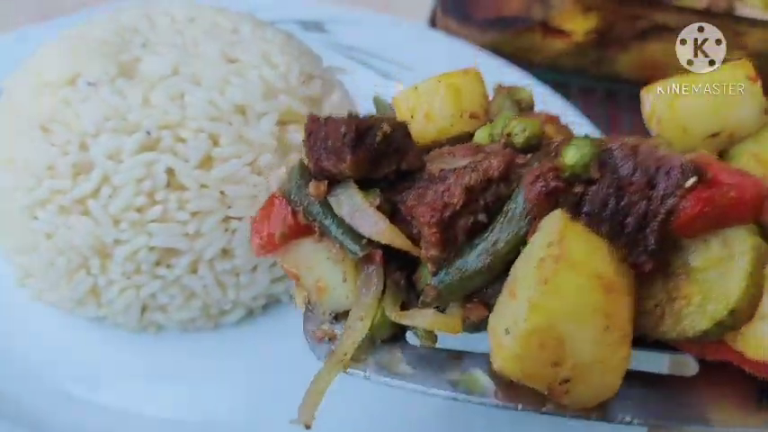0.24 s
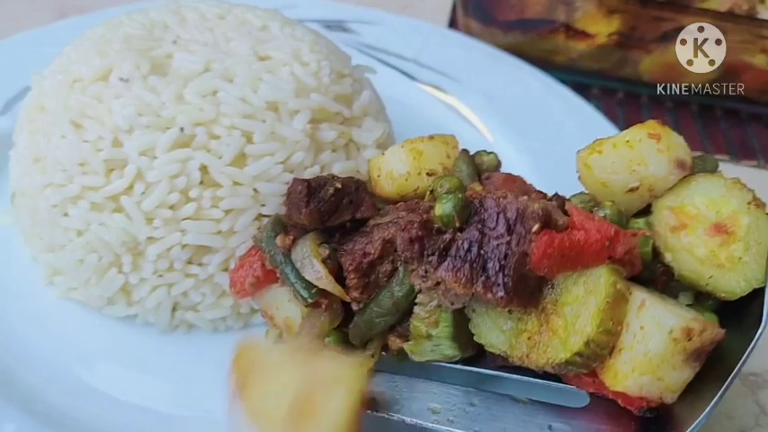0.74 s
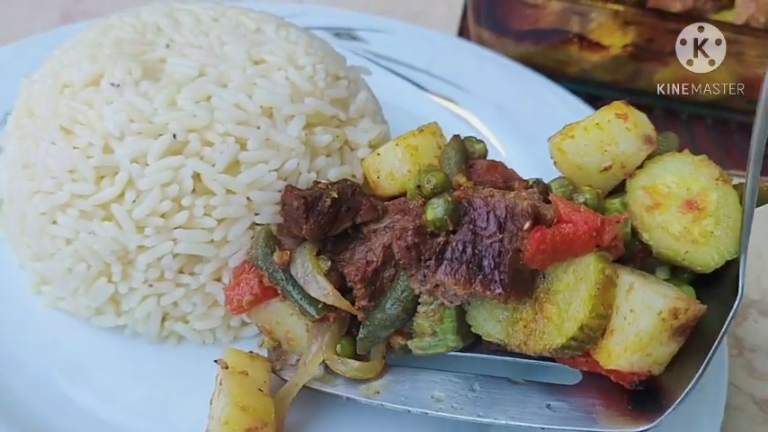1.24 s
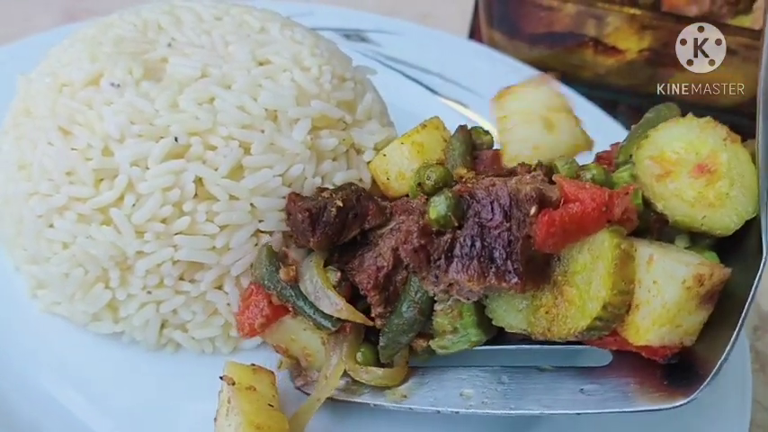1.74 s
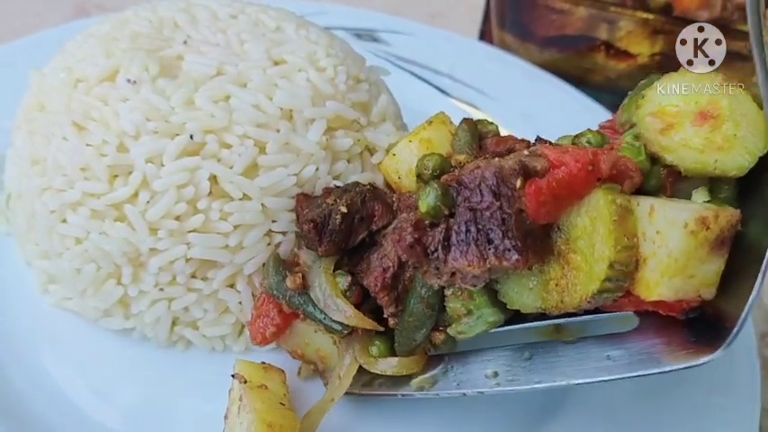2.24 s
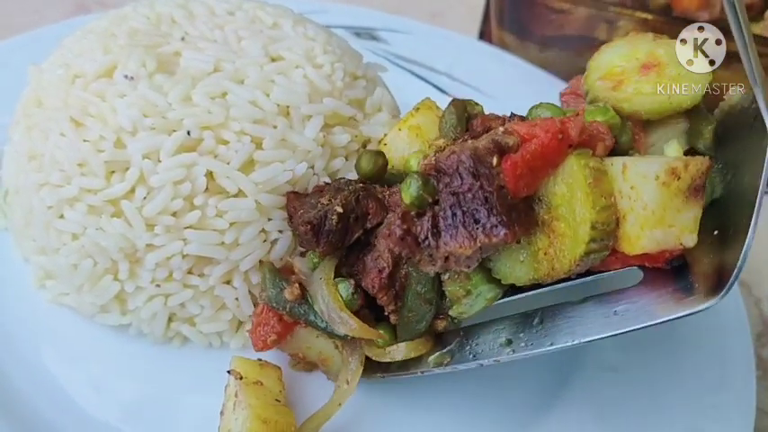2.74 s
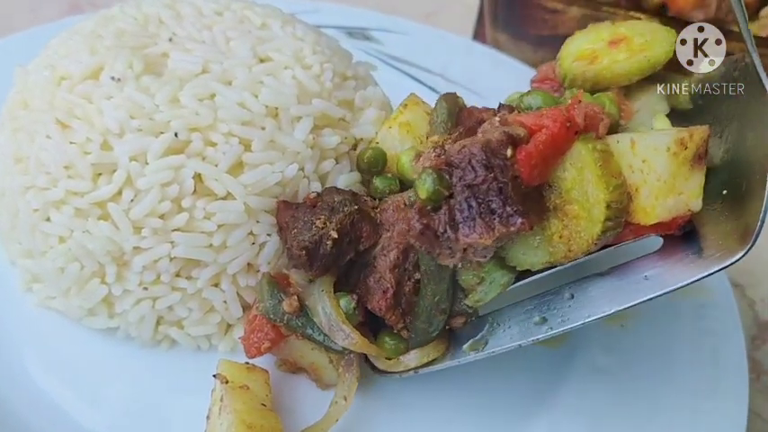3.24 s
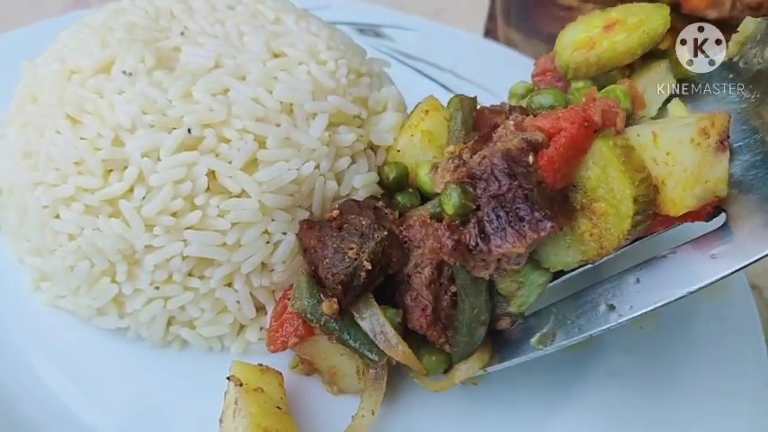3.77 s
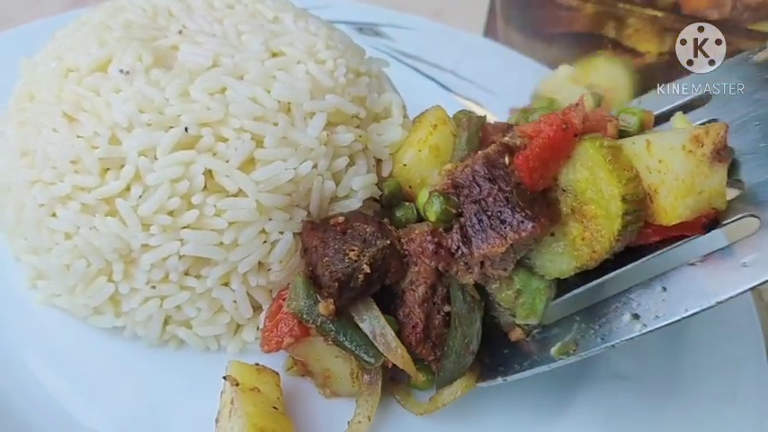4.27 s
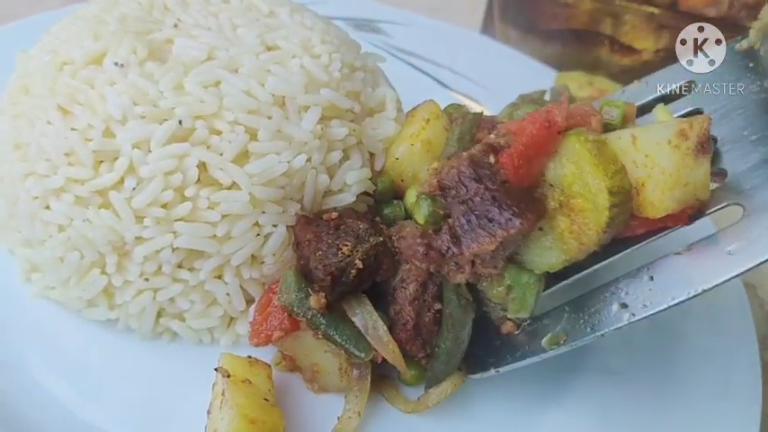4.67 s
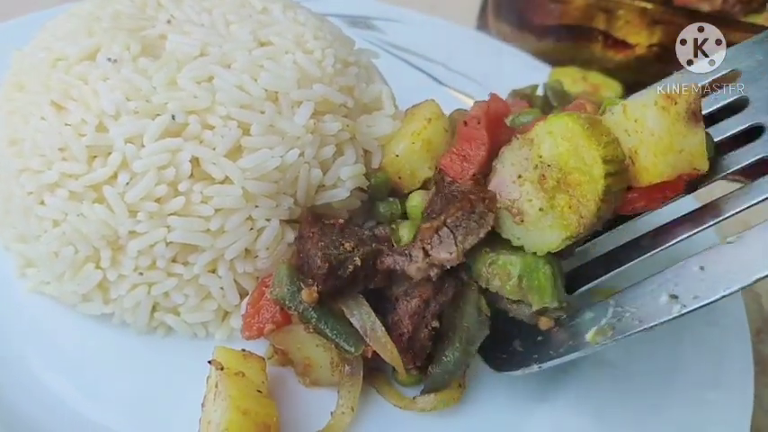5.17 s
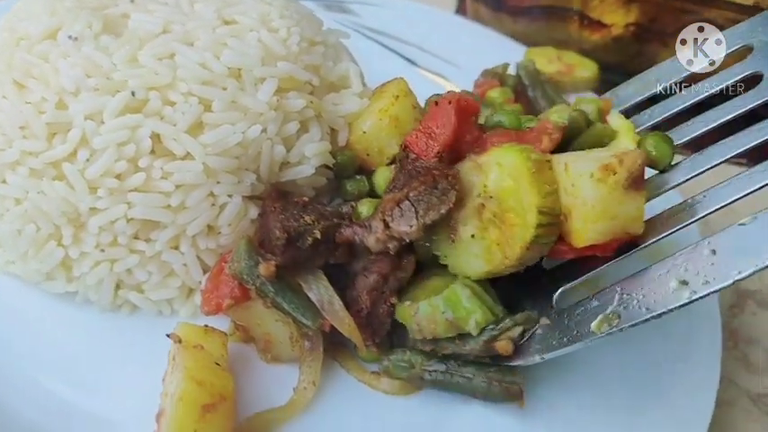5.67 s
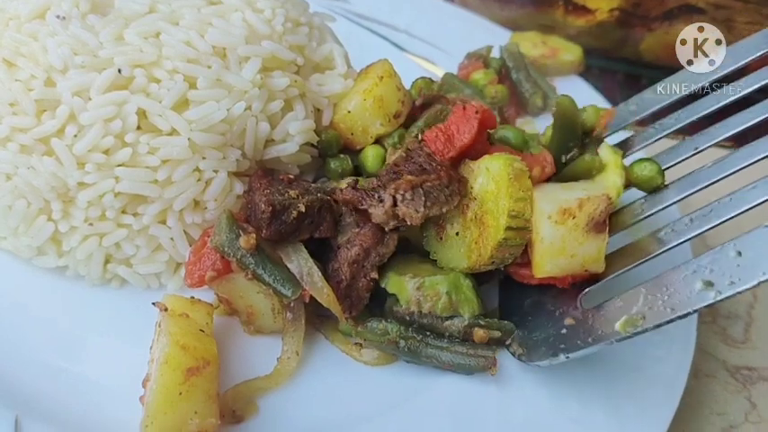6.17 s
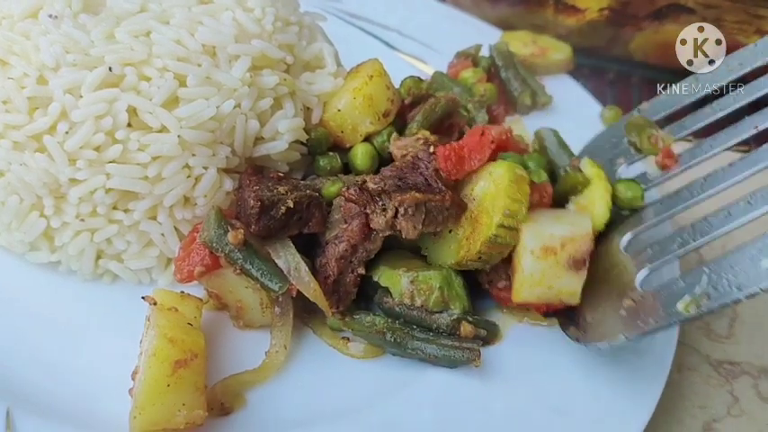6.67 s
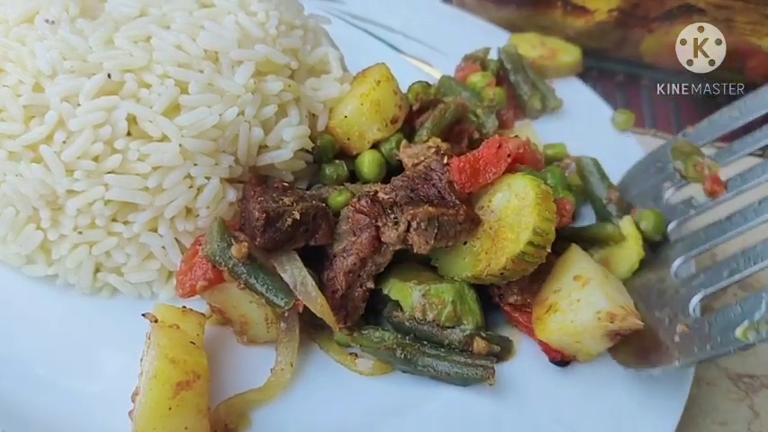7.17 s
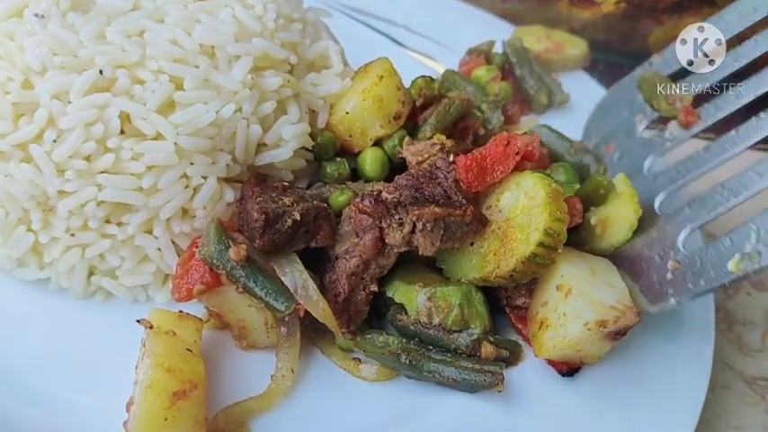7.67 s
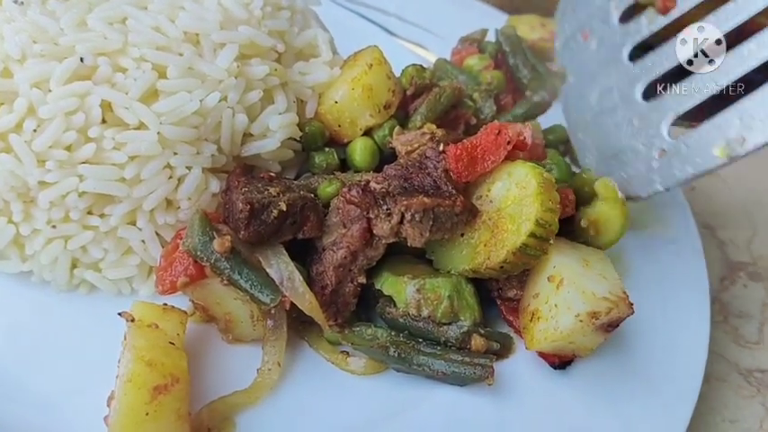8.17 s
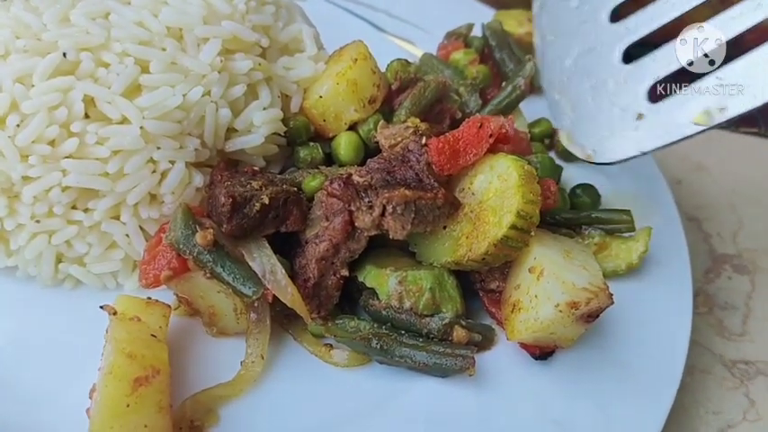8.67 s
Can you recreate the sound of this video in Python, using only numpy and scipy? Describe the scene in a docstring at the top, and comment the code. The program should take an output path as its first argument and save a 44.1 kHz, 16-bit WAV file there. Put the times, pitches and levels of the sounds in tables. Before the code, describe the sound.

A quiet home kitchen, close stereo phone pickup, about 9 seconds. Hot food hisses faintly, thinning away, over soft low outdoor rumble; a far dog barks very faintly, mostly as echo, near 0.7, 2.3, 3.1, 6.7, 7.2 and after 8.1. Tiny handle ticks run from 0.7 to 1.2. A spoon taps a slotted steel spatula: lightly at 1.4 and 2.0, stronger at 2.2, brightest at 2.55 with a quick follow-up, again clearly at 3.6, and weakly at 4.5. At 4.64 the blade clacks on a china plate; faint scraping chatter and rustle follow at 5.35-5.5. A clear clink at 6.3 leads into a tiny drag. At 7.13 one hard, bright knock, by far the loudest, rings briefly and clatters, with small skids just after. Then only thin rustle, sparse wet pops and rumble remain. Metal sounds are short and dry, with little room tail.

```python
"""In a kitchen, hot food (shaped noise) hisses less and less, over a low outdoor rumble (low shaped noise).
Far off a dog seems to bark now and then (hoarse harmonic notes, mostly echo), and a handle ticks faintly.
A spoon taps a slotted steel spatula; then its blade skids and drags on a china plate, just right of a phone,
as the food slides off with a rustle and a few wet pops; late on, the blade knocks the plate once hard.
Every contact is a chatter of tiny ticks that feeds fading modes, with a dry crack and a clatter of noise."""
import sys
import numpy as np
from scipy import signal
from scipy.fft import rfft, irfft, next_fast_len
from scipy.io import wavfile
from scipy.ndimage import uniform_filter1d

SR = 44100
rng = np.random.default_rng(int(sys.argv[2]) if len(sys.argv) > 2 else 0)


def wav_record(signal):
    """Record a signal, one row per channel, as 16-bit PCM in the file named by sys.argv[1]."""
    frames = np.transpose(np.atleast_2d(signal))
    bounded = np.clip(frames, -1, 1)
    # unit amplitude maps onto the largest positive 16-bit level
    quanta = np.round(bounded * 32767).astype(np.int16)
    wavfile.write(sys.argv[1], SR, quanta)


N = 392931
SIZE = next_fast_len(N)
HZ = np.maximum(np.arange(SIZE // 2 + 1) * SR / SIZE, 1)  # frequency of each spectrum bin
SPOT_DB = 7  # how much a blow favours the modes close to one named frequency


def spoon_taps():
    """A spoon taps the steel blade: clean blows start its modes nearly in step."""
    # taps: t/s, peak level/dB, brightness/dB per octave, left minus right/dB, ring share of t60,
    # [(f/Hz, gain/dB) of modes favoured or stilled]
    taps = [(1.4332, -36, 3.5, 2.5, 0.69, [(1860, 7), (2850, 11), (5980, 4)]),
            (1.989, -30.5, 5.5, 4.3, 0.96, [(1690, 14), (2186, 13), (4560, 6), (5980, 3)]),
            (2.2157, -24.5, 1.5, 6, 0.87, [(1800, -2), (1631, -9), (6600, 5), (2186, 5), (3120, 5.5)]),
            (2.55, -20.5, 5, 2, 0.64, [(1850, 9), (7400, 0), (2186, 8), (3120, -1), (4930, 6.5)]),
            (2.645, -29.5, 1.5, 2.5, 0.7, [(1790, -0.5), (3120, 4)]),
            (3.581, -25, 4.5, 2, 0.75, [(1850, 14.5), (2912, 0), (6700, 10), (4180, 2)]),
            (3.9865, -57, -1, -4, 0.88, [(1760, 4)]), (4.225, -60.5, 0, -17, 1, [(1700, 7), (2400, 12)]),
            (4.53, -36, -0.5, 4, 0.9, [(1660, 8), (2400, 6), (3120, -3), (1830, -4)])]
    # modes of blade under the spoon: f/Hz; then relative level/dB, t60/s
    mode_hz = [1760, 1631, 1820, 1875, 2186, 2480, 2912, 3120, 4180, 4560, 4930, 6218, 6700, 8000, 9700,
               11600, 5980, 7400, 8900]
    modes = [(11, 0.032), (-8, 0.12), (6, 0.031), (-4.5, 0.032), (-16, 0.23), (-7, 0.057), (-7, 0.07),
             (-1, 0.024), (-17, 0.035), (-20.5, 0.042), (-12, 0.018), (-7.5, 0.019), (-4.5, 0.019),
             (-12, 0.027), (-26.5, 0.068), (-30, 0.023), (-7, 0.0265), (-12, .025), (-19, 0.014)]
    skid_ms = 2.8
    contacts = [(s, db, tilt, skid_ms, pan, ring, spots) for s, db, tilt, pan, ring, spots in taps]
    return strike(contacts, mode_hz, modes, spot_db=0.28, crack_db=-12.0, clatter_db=-14, clatter_s=0.03,
                  top_hz=9600, jolt=0.29, loose=0.15)


def handle_ticks():
    """Faint ticks of the handle, each favouring one of its modes."""
    # ticks: t/s, peak level/dB, favoured mode f/Hz
    handle_contacts = [(0.668, -50.5, 1390), (0.679, -61, 1390), (0.7286, -50, 980), (0.74, -56, 2900),
                       (0.7774, -50, 1390), (0.842, -49, 1390), (0.982, -52, 1390), (1.094, -54, 2200),
                       (1.1664, -52.5, 1390), (3.2876, -64, 1390), (3.4913, -49.5, 2500)]
    # modes of the handle: f/Hz; then relative level/dB, t60/s
    mode_hz = [980, 1390, 1520, 2200, 2500, 2900, 8400, 13600, 14500]
    modes = [(8, 0.021), (3, 0.058), (-4, .03), (0, 0.073), (1, 0.038), (-3, 0.046), (2, 0.0095),
             (-13, 0.036), (-12, 0.035)]
    skid_ms, ring_share, tilt_db = 3.1, 0.92, 2
    contacts = [(s, db, tilt_db, skid_ms, 0, ring_share, [(hz, SPOT_DB)]) for s, db, hz in handle_contacts]
    return strike(contacts, mode_hz, modes, spot_db=4.5, crack_db=2, clatter_db=-7, clatter_s=0.02,
                  top_hz=15000, jolt=0.48)


def blade_skids():
    """The blade lands on china and skids; each landing spot favours or stills other modes of the blade."""
    # skids: t/s, peak level/dB, brightness/dB per octave, skid/ms (ends by 27), ring share of t60,
    # [(f/Hz, gain/dB) of modes favoured or stilled]
    skids = [(4.640, -29, -4, 3.0, 0.83, [(6210, 14), (2180, 2.5), (5329, 5.5), (7235, 7), (5060, -9),
             (8310, -5.5), (2783, -10.5), (9475, 4)]), (5.346, -56, 7, 7.0, .5, [(7235, 4), (13500, 12),
             (15000, 12.5)]), (5.352, -49.5, -0.5, 4.0, 0.4, [(2961, -5), (9480, 13), (10750, 17),
             (13500, 25), (8310, -6), (5060, -8), (5329, -10), (3690, -10)]),
             (5.422, -60, 10, 34, .5, [(6210, 7), (9480, 6), (10750, 10), (13500, 18), (8310, -4),
             (5060, -8)]), (5.429, -52, 0, 3.0, 0.53, [(1930, 13), (7235, 10), (6210, 7)]),
             (5.452, -56, 1, 15, 0.55, [(7235, 9), (6210, 4), (9480, 12), (13500, 16), (15000, 18),
             (5060, -8)]), (5.469, -53, -8, 6.0, 0.44, [(1930, 13)]),
             (5.485, -52.5, -16, 4.0, 0.39, [(1540, 3)]), (5.496, -52.5, -5, 6.0, 0.33, [(1690, 7),
             (7235, 17), (15000, 24), (5315, 6)]), (6.286, -32.5, 2, 4.0, 1, [(5060, 16.5), (1930, 16),
             (1378, 10.5), (2245, 7), (7235, -2), (3690, -3.5), (1545, -14), (1685, -12), (9480, -15),
             (8310, 3)]), (7.176, -39, 1, 5.0, 0.62, [(2961, -4), (6210, -1), (3690, 8), (7235, -10)]),
             (7.186, -37, 2, 8.0, 0.76, [(2961, 17), (5329, 4), (4485, 7), (2186, 11), (9480, 0),
             (7235, -12), (8310, -8)])]
    # modes of the blade: f/Hz; then relative level/dB, t60/s
    mode_hz = [1220, 1378, 1545, 1685, 1920, 2186, 2245, 2492, 2783, 2935, 3106, 3680, 4485, 5060, 5315,
               6212, 7230, 8310, 9475, 10750, 11500, 13500, 15000]
    modes = [(-3.5, 0.035), (-7.5, 0.0371), (-9, 0.074), (-3.5, 0.067), (-6.5, 0.079), (-12, 0.19),
             (-12, 0.065), (-0.5, 0.048), (-11, 0.099), (0, 0.076), (4.5, 0.05), (-0.5, 0.094), (-7, 0.2),
             (-7.5, 0.049), (-8, 0.11), (-10, 0.16), (-8.5, 0.082), (-14, 0.12), (-21.5, 0.1), (-26.5, .06),
             (-36.5, .05), (-37.5, 0.079), (-35.5, .06)]
    contacts = [(s, db, tilt, ms, 0, ring, spots) for s, db, tilt, ms, ring, spots in skids]
    return strike(contacts, mode_hz, modes, spot_db=1.5, crack_db=-9, clatter_db=-3, clatter_s=0.035,
                  top_hz=9300, jolt=0.7)


def blade_drags():
    """The blade drags, pressed down: it rings on modes of its own, with strong clatter."""
    # drags: t/s, peak level/dB, brightness/dB per octave, skid/ms, ring share of t60, favoured mode f/Hz
    drags = [(6.357, -55, -1, 12.0, .6, 1860), (6.371, -51, 2, 20.0, .7, 1860),
             (6.385, -48.5, -1.5, 9.0, .7, 8350), (6.391, -45.5, 1, 13.8, 1.0, 5980)]
    # modes of the pressed blade: f/Hz; then relative level/dB, t60/s
    mode_hz = [1360, 1860, 2920, 3610, 4460, 5010, 5980, 6230, 7410, 8300, 8420, 8860, 9400, 9700, 10600,
               11400]
    modes = [(-4, 0.078), (2, 0.053), (5, 0.062), (-4, .04), (0, 0.085), (1, .05), (2, 0.055), (-3, .05),
             (-3, 0.1), (-9, .05), (-9, .05), (-13, .05), (-16, .07), (-9, 0.11), (-13, .05), (-25, .05)]
    contacts = [(s, db, tilt, ms, 0, ring, [(hz, SPOT_DB)]) for s, db, tilt, ms, ring, hz in drags]
    return strike(contacts, mode_hz, modes, spot_db=1.0, crack_db=-12, clatter_db=-1, clatter_s=0.03,
                  top_hz=11000, jolt=1.0)


def plate_knock():
    """One hard knock rings the plate; then the blade settles on it and its modes fade faster."""
    # knock: t/s, peak level/dB, skid/ms, ring share of t60, favoured mode f/Hz
    knocks = [(7.1332, -11, 12.0, 0.95, 7170)]
    # modes of the plate: f/Hz; then relative level/dB, t60/s before the blade settles
    mode_hz = [689, 857, 996, 1185, 1690, 1728, 1933, 2181, 2320, 2478, 2584, 2912, 3278, 3628, 3720, 4050,
               4490, 4695, 5141, 5250, 5295, 6304, 7040, 7235, 7475, 7784, 8018, 8300, 8936, 9440, 10540,
               11790, 12700, 13600, 14500]
    modes = [(-30.5, 0.14), (-15, 0.073), (-22.5, 0.087), (-22, 0.0614), (-5.5, 0.021), (-36.5, 0.13),
             (-18, 0.15), (-19, 0.24), (-12, 0.12), (-27, 0.18), (-17, 0.14), (-22.5, 0.2), (-8, 0.15),
             (-19, 0.11), (-13, .05), (-38.5, 1.1), (-28, 0.057), (-37.5, 0.74), (-24, 0.097), (-10, 0.021),
             (-25, 0.34), (-13, 0.086), (-18, 0.059), (-0.5, 0.047), (-16.5, .07), (-1, 0.081),
             (-15.5, 0.092), (-22, .1), (-34.5, .1), (-15, 0.1), (-22, 0.05), (-36.5, 0.061), (-38, .05),
             (-38.5, .05), (-40.5, .045)]
    contacts = [(s, db, 0, ms, 0, ring, [(hz, SPOT_DB)]) for s, db, ms, ring, hz in knocks]
    return strike(contacts, mode_hz, modes, spot_db=0.3, crack_db=-17, clatter_db=-12, clatter_s=0.15,
                  top_hz=11000, jolt=0.25, press=1.3)


def strike(contacts, mode_hz, modes, spot_db, crack_db, clatter_db, clatter_s, top_hz, jolt, press=0, loose=1):
    """Each contact is a quick chatter of ticks that feeds the modes of one object.

    spot_db: random spread of mode levels; jolt: phase knock of a tick in radians; loose: spread of
    starting phases in cycles; press: share by which fading speeds up once the object is pressed.
    """
    pressed_s, chatter = 0.031, 1200  # delay before the press; longest chatter in samples
    hz = np.array(mode_hz)[:, None]
    db, free_t60 = np.transpose(modes)[:, :, None]
    length = min(int(free_t60.max() * SR) + chatter, SR // 2)
    t = np.arange(length) / SR
    aged = t + press * np.maximum(t - pressed_s, 0)
    band = signal.butter(4, [600, top_hz], "band", fs=SR, output="sos")
    out = np.zeros((2, N))
    for s, peak_db, tilt_db, skid_ms, pan_db, ring, spots in contacts:
        favour = sum(g * np.exp(-(np.log(hz / f) / .02) ** 2) for f, g in spots)
        colour = favour + rng.standard_normal(hz.shape) * spot_db + tilt_db * np.log2(hz / 2000)
        tick_here = (rng.random(chatter) < .025) * (t[:chatter] < skid_ms / 1000)
        ticks = (1.0 + rng.random(chatter)) * tick_here
        ticks[0] = 0.95

        def fed(decay):
            """Envelope of a decay restarted by every tick; energies add."""
            energy = signal.fftconvolve(decay ** 2, ticks[None], axes=1)[:, :length]
            return np.sqrt(np.abs(energy))

        # every tick knocks the phase of every mode
        jolts = np.cumsum(jolt * rng.standard_normal((len(hz), chatter)) * (ticks > 0), axis=1)
        jolts = jolts[:, np.minimum(np.arange(length), chatter - 1)]
        phase = 2 * np.pi * (hz * t + loose * rng.random(hz.shape)) + jolts
        ringing = fed(1000 ** (-aged / (free_t60 * ring)))
        hit = np.sum(undb(db + colour) * ringing * np.sin(phase), axis=0)
        # a dry crack at each tick, and the many small modes that blur into noise
        crack = undb(crack_db) * fed(np.exp(-t[None] / 0.00017))
        clatter = undb(clatter_db) * fed(1000 ** (-t[None] / (clatter_s * ring)))
        noise = (crack + clatter)[0] * rng.standard_normal(length)
        hit += signal.sosfilt(band, undb(1.2 * tilt_db) * noise)  # brighter contacts are noisier
        hit *= 1 - np.exp(-t / 0.00057)  # soft onset
        hit /= np.sqrt(2 * uniform_filter1d(hit ** 2, 150).max())
        add(out, s, hit * undb(peak_db + np.array([[pan_db], [-pan_db]]) / 2))
    return out


def pops():
    """Wet pops of the food: tiny bright noise bursts, a few ms each."""
    # pops: t/s, relative level/dB
    pop_times = [(4.33, -58), (5.85, -60), (6.001, -49), (7.5407, -61), (8.6, -56.5)]
    out, t = np.zeros((2, N)), np.arange(800) / SR
    burst = np.exp(-t / 0.0025) * (1 - np.exp(-t / 0.00082))
    for s, db in pop_times:
        add(out, s, undb(db) * rng.standard_normal((2, 800)) * burst)
    return signal.sosfilt(signal.butter(2, 6500, "high", fs=SR, output="sos"), out)


def food():
    """Sliding food rustles, hot food hisses: three flickering noise bands that follow drawn levels."""
    # food levels: t/s, rustle level/dB, hiss level/dB
    food_levels = [(0.0, -65.5, -69), (0.52, -70.5, -71.5), (1.07, -69, -70), (1.86, -74, -72),
                   (2.51, -67.5, -74.5), (2.98, -73, -74.5), (3.57, -70.5, -74), (4.3, -84.5, -76.5),
                   (4.6, -87, -80), (4.68, -66.5, -75), (4.95, -88.5, -82.5), (5.3, -87, -78.5),
                   (5.42, -69, -77.5), (5.75, -73, -77), (6.15, -80.5, -79), (7.05, -81, -81),
                   (7.2, -62.5, -72.5), (7.36, -76, -80), (8.14, -78, -81.5), (8.55, -85, -78.5),
                   (8.91, -73.5, -80)]
    # fine sizzle, which dies faster than the hiss as the food cools: t/s, level/dB
    fine_levels = [(0.0, -79), (3.62, -85), (4.44, -92), (5.24, -100), (5.56, -88), (6.9, -99.5),
                   (7.25, -88), (7.87, -100), (8.91, -101)]
    # noise colours: f/Hz, relative level/dB
    rustle_colour = [(500, 4), (1000, 0.5), (1800, 3), (2500, -0.5), (3500, -7), (4300, -15.5), (5500, -12),
                     (9000, -32.5)]
    hiss_colour = [(3500, -27.5), (4200, -11.5), (5300, -7.5), (6300, 0), (7200, -1.2), (8100, 2),
                   (9500, -10.5), (11500, -22)]
    sizzle_colour = [(9000, -3.5), (11000, -8.5), (14500, -10), (15500, -10.5), (16000, -17)]
    rustle_db, hiss_db = along(food_levels)
    (sizzle_db,) = along(fine_levels)
    rustle = undb(rustle_db) * wash(rustle_colour, 1700, 4900, flicker_db=0.51)
    hiss = undb(hiss_db) * wash(hiss_colour, 6200, 7800, flicker_db=0.86)
    sizzle = undb(sizzle_db) * wash(sizzle_colour, 10000, 15130, flicker_db=1.2)
    return rustle + hiss + sizzle


def dog():
    """Short hoarse harmonic notes that scoop up to pitch, heard mostly as echo."""
    # barks: t/s, pitch f/Hz, relative level/dB, length/s, overtone level/dB, share of pitch scooped up
    barks = [(0.648, 657, -65, 0.14, -25, 0.083), (0.784, 643, -71, 0.055, -12, 0.014),
             (0.88, 632, -64.5, 0.063, -23, 0.017), (2.32, 612, -63.5, 0.11, -20, 0.033),
             (3.02, 616, -63, 0.06, -13, .04), (3.18, 630, -67.5, 0.061, -9, 0.024),
             (6.68, 562, -64, 0.19, -5, 0.047), (7.2, 556, -62.5, 0.21, -8, 0.044),
             (7.38, 554, -66, 0.12, -8.5, 0.034), (8.156, 554, -65, 0.08, -0.5, 0.027),
             (8.663, 572, -61, 0.061, 2.5, .11), (8.77, 552, -65.5, 0.084, -5.5, .03)]
    # overtones of the throat: multiple of pitch, relative level/dB
    throat = [(1.5, -7), (2, -9), (3, -4)]
    scoop_s, yard_t60_s = 0.035, 0.8
    out, waver, rasp = np.zeros(N), walk(45), undb(5 * walk(90))
    for s, hz, db, length, over_db, scoop in barks:
        t = np.arange(int(length * SR)) / SR
        pitch = hz * (1 - scoop * np.exp(-t / scoop_s) + .04 * waver[int(s * SR):][:len(t)])
        turn = 2 * np.pi * np.cumsum(pitch) / SR
        note = np.sin(turn) + sum(undb(g + over_db) * np.sin(k * turn) for k, g in throat)
        swell = np.sin(np.pi * np.sqrt(t / length)) ** 0.28
        add(out, s, undb(db) * note * swell)
    hoarse = out * rasp
    return 0.55 * hoarse + echo(hoarse, yard_t60_s, damp_hz=3600)


def outdoor_rumble():
    """Low outdoor noise whose octave bands swell and dip independently."""
    # colour of the rumble: f/Hz, relative level/dB per Hz
    rumble_colour = [(15, -50.5), (25, -23.5), (56, -1.5), (104, -1), (129, -6.5), (189, -6), (389, -12),
                     (466, -12.5), (525, -15.5), (629, -14.5), (1040, -14.5), (1750, -31), (1850, -39),
                     (2090, -47), (3000, -57), (3900, -68), (6600, -120)]
    # rumble level: t/s, level/dB
    rumble_levels = [(0.0, -57.5), (0.42, -60.5), (2.0, -59.5), (3.87, -58.5), (4.34, -63), (4.9, -61),
                     (5.24, -62), (5.45, -55.5), (5.75, -56), (6.03, -58), (6.5, -57.5), (7.3, -58),
                     (8.54, -58), (8.91, -55.5)]
    (rumble_db,) = along(rumble_levels)
    return undb(rumble_db) * wash(rumble_colour, 44, 370, flicker_db=2.6)


def wash(colour, lo_hz, hi_hz, flicker_db):
    """Stereo noise of a given colour, 0 dB rms between lo and hi before its octave bands flicker alone."""
    # how alike left and right are: f/Hz, correlation
    likeness = [(60, 0.96), (130, 0.94), (290, 0.99), (640, 0.55), (1410, 0.38), (3100, 0.05), (6820, 0.01),
                (15000, 0.01)]
    like = np.clip(on_log(likeness, HZ), -.95, .99)
    mid, side = rfft(rng.standard_normal((2, SIZE)))
    pair = np.sqrt((1 + like) / 2) * mid + np.sqrt((1 - like) / 2) * side * np.array([[1], [-1]])
    lowest, highest = colour[0][0], colour[-1][0]
    gain = undb(on_log(colour, HZ)) * (HZ > lowest) * (HZ < highest)
    in_band = (HZ > lo_hz) * (HZ < hi_hz)
    gain = gain / np.sqrt(np.mean(gain ** 2 * in_band * (1 + like) / 2))
    out = 0
    for octave in range(int(np.log2(lowest)), int(np.log2(highest)) + 2):
        share = np.cos(np.pi / 2 * np.clip(np.log2(HZ) - octave, -1, 1)) ** 2
        out = out + irfft(pair * gain * share, SIZE)[:, :N] * undb(flicker_db * walk(9))
    return out


def echo(x, t60_s, damp_hz):
    """Diffuse tail: fading noise, another on each side, unit energy."""
    t = np.arange(int(t60_s * SR)) / SR
    fade = 1000 ** (-t / t60_s) * (1 - np.exp(-t / 0.0013))
    tail = rng.standard_normal((2, len(t))) * fade
    tail = signal.lfilter(*signal.butter(1, damp_hz, fs=SR), tail)
    tail = tail / np.sqrt(np.sum(tail ** 2, 1, keepdims=True))
    return signal.fftconvolve(x[None], tail, axes=1)[:, :N]


def ports(pair, shade, lag_ms):
    """The phone body shades and delays what the left port hears of a source."""
    left = rfft(pair[0], SIZE) * undb(on_log(shade, HZ)) * np.exp(-2j * np.pi * HZ * lag_ms / 1000)
    return np.array([irfft(left, SIZE)[:N], pair[1]])


def undb(db):
    """Turn dB into gain."""
    return 10 ** (np.asarray(db) / 20)


def on_log(table, hz):
    """Read (Hz, value) rows on a log-frequency axis."""
    f, v = np.transpose(table)
    return np.interp(np.log(hz), np.log(f), v)


def along(table):
    """Columns of (s, value, ..) rows, sample by sample."""
    s, *columns = np.transpose(table)
    return [np.interp(np.arange(N) / SR, s, c) for c in columns]


def walk(rate):
    """Random levels held 1 / rate s and slewed twice; spread near 1."""
    k = int(SR / rate)
    steps = np.repeat(rng.standard_normal(N // k + 1), k)
    return 1.32 * uniform_filter1d(uniform_filter1d(steps, k), k)[:N]


def add(out, s, sound):
    """Mix a short sound in at s seconds."""
    i = int(s * SR)
    part = sound[..., :N - i]
    out[..., i:i + part.shape[-1]] += part


def scene():
    """Near contacts through the two ports, their room tail, and the background."""
    # shading of the left port for each place: f/Hz, gain/dB
    shade_spoon = [(1000, 1), (1400, -12), (2400, -14), (3300, -7), (5000, 3), (8000, -1), (12000, -4)]
    shade_blade = [(1000, -3), (2000, -1), (3300, -5), (5000, 3), (8000, -8), (12000, -7)]
    shade_plate = [(1000, -3), (2400, -2), (3300, 1), (5000, -1), (7500, -19), (12000, -5)]
    shade_yard = [(100, 0), (200, -1), (2400, -1.5), (4400, 2), (8000, -5)]
    spoon = ports(spoon_taps() + handle_ticks(), shade_spoon, lag_ms=0.082)
    blade = ports(blade_skids() + blade_drags(), shade_blade, lag_ms=0.11)
    plate = ports(plate_knock(), shade_plate, lag_ms=0.036)
    near = spoon + blade + plate
    room_db, room_t60_s = -16, 0.13
    room = undb(room_db) * echo(near[1], room_t60_s, damp_hz=2800)  # fed from the right port
    back = ports(food() + outdoor_rumble(), shade_yard, lag_ms=0.3)
    return near + room + back + pops() + dog()


def record(dry):
    """The phone cuts the top with a steep low-pass."""
    top_hz = 15600
    return signal.sosfilt(signal.ellip(8, .2, 70, top_hz, fs=SR, output="sos"), dry)


dry = scene()
out = record(dry)
wav_record(out)
```